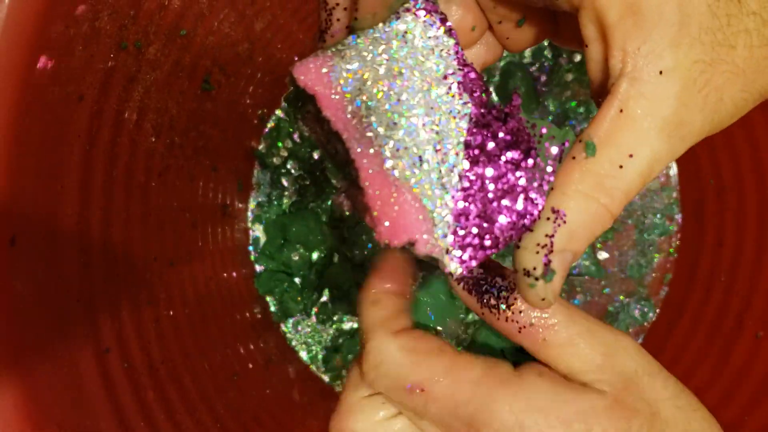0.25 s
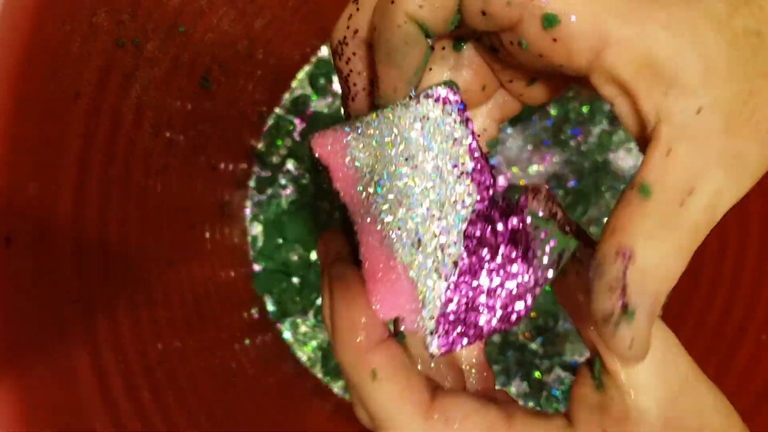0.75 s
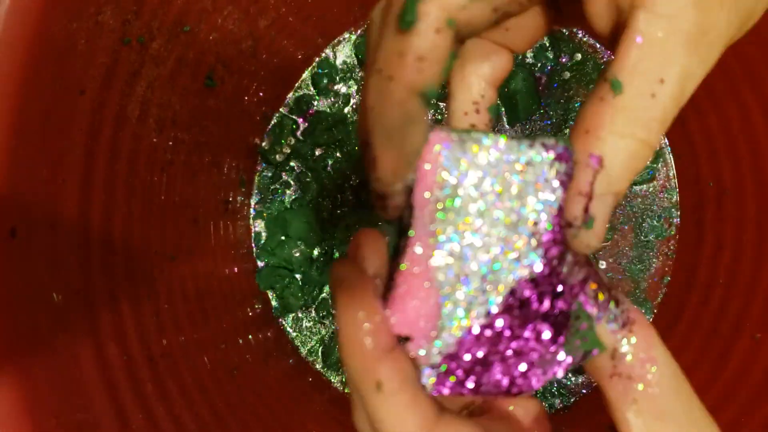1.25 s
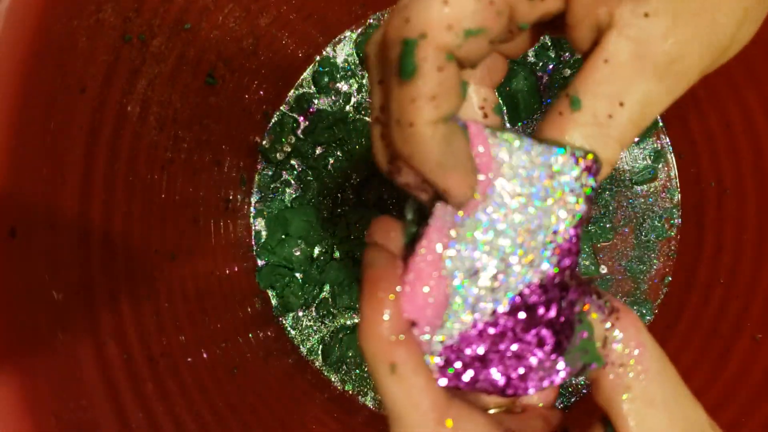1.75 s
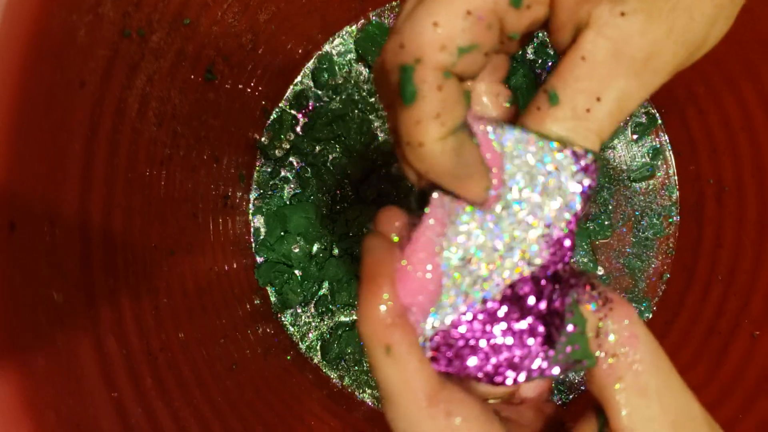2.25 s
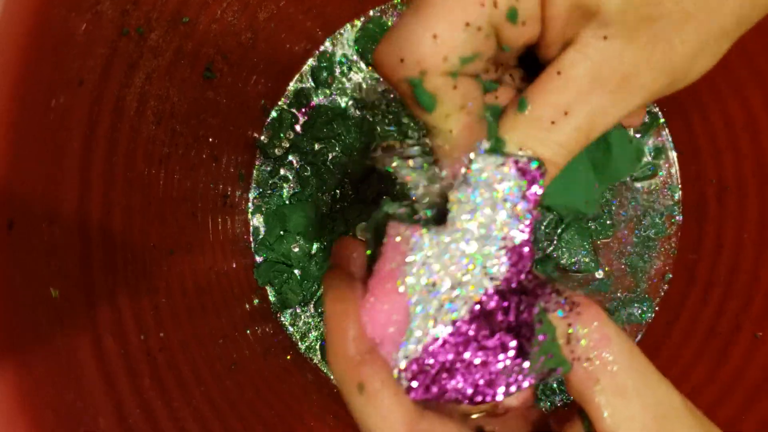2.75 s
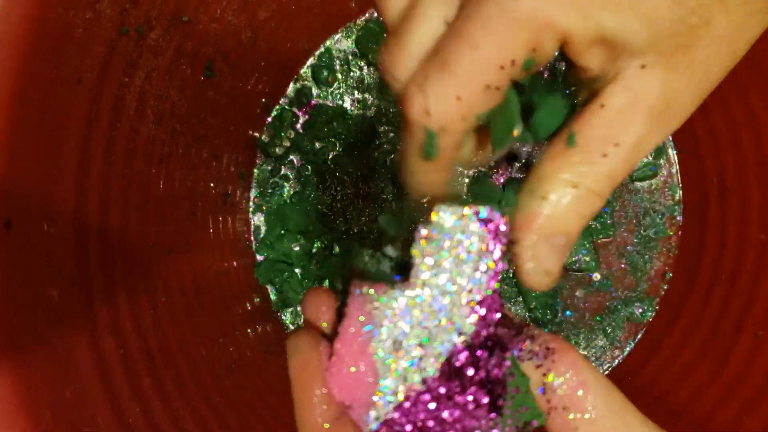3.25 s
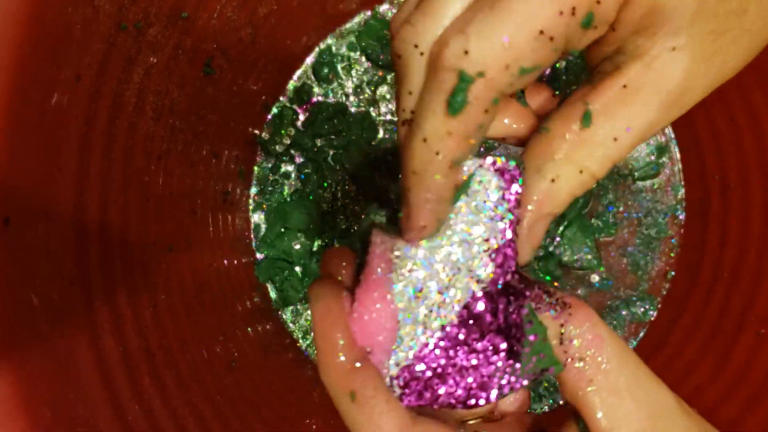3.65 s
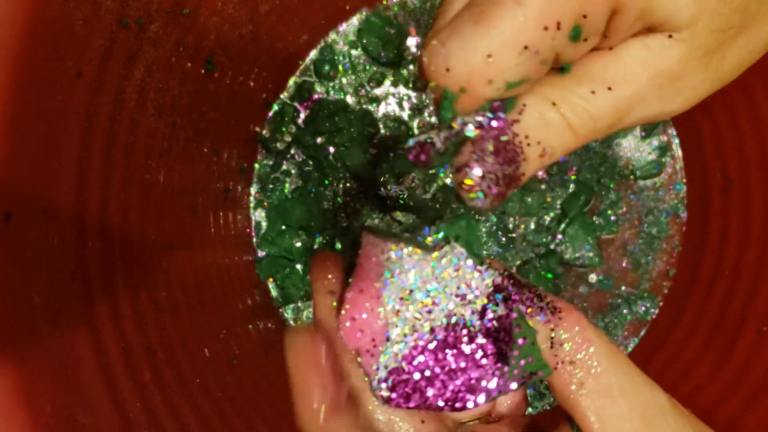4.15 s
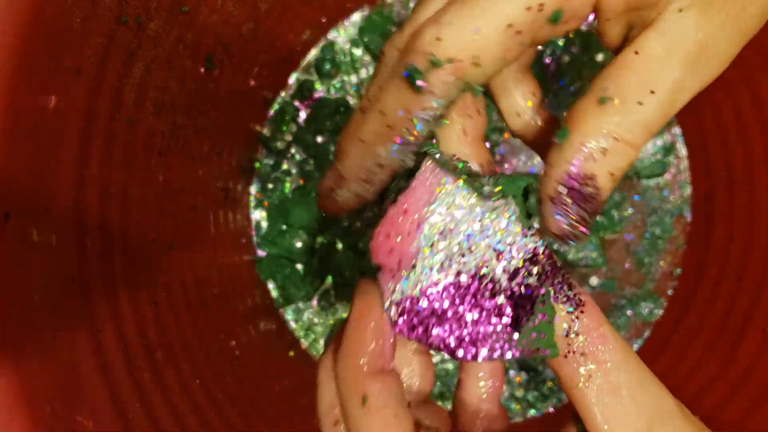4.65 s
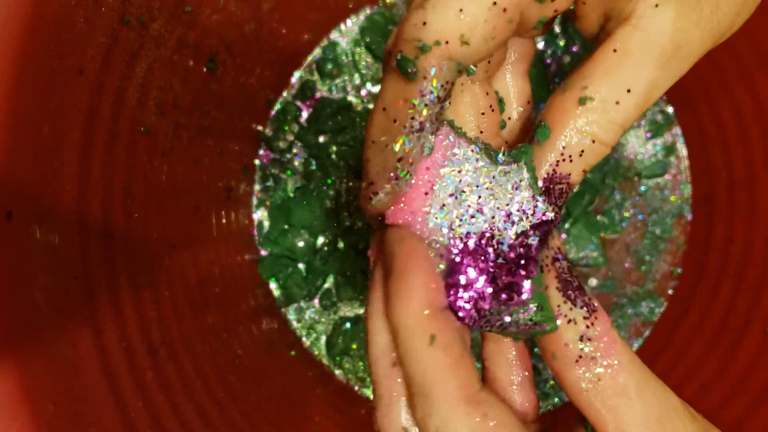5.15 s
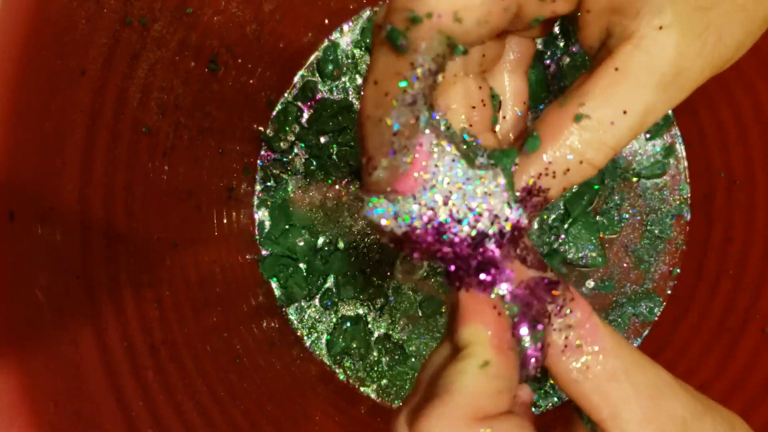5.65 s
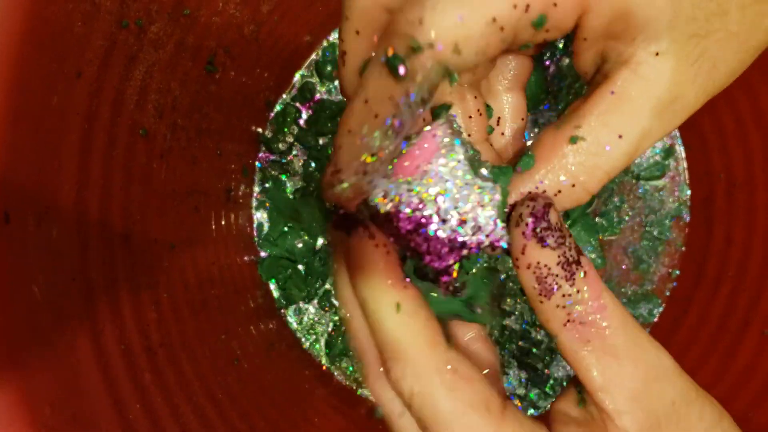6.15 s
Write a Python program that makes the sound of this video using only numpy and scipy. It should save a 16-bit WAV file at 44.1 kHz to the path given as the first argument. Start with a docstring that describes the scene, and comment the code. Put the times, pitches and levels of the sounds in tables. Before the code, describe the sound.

Close, brittle foam crunching comes in uneven squeezes, with small wet slaps and dull basin knocks over quiet room hiss and hum.

```python
"""Wet hands crush a block of floral foam over a plastic basin of water, close to a pair of small microphones.
Cell walls snap in bursts over fine crackle: torn-foam noise, opened by levels and rung at each snap's pitch.
Soft breath-like hiss, wet squelch and slaps are shaped noise; blows ring the basin's modes; wet chirps glide.
Behind them a table mode shudders, filtered noise rumbles and booms, wavering tones hum, and room air hisses."""
import sys
import numpy as np
from scipy import signal
from scipy.fft import rfft, irfft, next_fast_len
from scipy.io import wavfile

SR = 44100
rng = np.random.default_rng(int(sys.argv[2]) if len(sys.argv) > 2 else 0)


def to_wav(s):
    """Save 16-bit WAV."""
    ch = np.atleast_2d(s).T  # columns
    pcm = np.round(np.clip(ch, -1, 1) * 32767)  # PCM
    wavfile.write(sys.argv[1], SR, pcm.astype(np.int16))


N = 282229

# squeeze of the hands: start_s, pressure_db (level of fine crackle), soft_db (level of soft hiss and squelch)
SQUEEZE = [(0.0, -54.5, -92), (0.2, -55.5, -80), (0.45, -76, -90), (0.7, -58.5, -75.5), (0.85, -71.5, -98),
           (1.2, -70, -95), (1.4, -61, -102), (1.66, -60, -57.5), (1.77, -65, -65), (1.88, -85, -64),
           (2.05, -59, -72), (2.21, -45.5, -66), (2.42, -45.5, -63), (2.6, -48, -70), (2.97, -43, -66),
           (3.26, -49.5, -72), (3.42, -58, -86), (3.65, -52, -77), (3.95, -66.5, -90), (4.3, -55.5, -84),
           (4.8, -63.5, -82), (5.1, -71.5, -86), (5.25, -56, -89), (5.42, -62, -59.5), (5.52, -63.5, -78),
           (5.78, -51, -69), (6.06, -43.5, -60.5), (6.27, -48.5, -72), (6.4, -59, -81)]
# spectrum of torn foam: freq_hz, density_db (per Hz)
FOAM_SPECTRUM = [(470, -54), (800, -8), (1120, -12), (1290, -11.5), (1800, -6.5), (1940, -10), (2310, -11),
                 (2820, -9), (3620, -15), (4710, -17), (7290, -13), (8900, -13), (13300, -2), (14500, 0.5),
                 (15800, -13)]
# blows of crumbs and hands on the basin: start_s, thud_db, knock_db (levels ahead of the mode gains)
BLOWS = [(0.06, -30, -49.5), (0.635, -43, -68), (0.66, -38, -44.5), (0.688, -32, -35), (2.13, -44, -62),
         (2.206, -38.5, -51.5), (2.251, -39, -49), (2.76, -44, -50), (2.853, -55, -50.5), (2.906, -57, -41),
         (3.194, -56, -51), (3.441, -27, -43.5), (3.553, -42, -47.5), (3.621, -39.5, -58),
         (3.649, -36, -64), (4.686, -55, -47), (4.752, -44, -42.5), (5.625, -53, -50), (6.049, -37, -49.5),
         (6.31, -51, -59)]
FIRM_DB = -47   # pressure of a firm squeeze
CREST_DB = 8.5   # peak of a noisy splash over its rms


def from_db(db):
    """Amplitude ratio of a level in dB."""
    return 10 ** (np.asarray(db) / 20)


def rms_one(x):
    """Scale to rms 1 over all channels."""
    return x / np.sqrt(np.mean(x ** 2) + 1e-20)


def in_time(rows):
    """Table columns interpolated to every sample."""
    s, *columns = np.transpose(rows)
    return [np.interp(np.arange(N) / SR, s, c) for c in columns]


def at_hz(points, hz):
    """Spectrum level in dB, interpolated over log frequency."""
    points_hz, points_db = np.transpose(points)
    return np.interp(np.log(hz), np.log(points_hz), points_db)


def colour(x, points):
    """Weight a signal by a spectrum."""
    size = next_fast_len(N)
    hz = np.maximum(np.fft.rfftfreq(size, 1 / SR), 1)
    return irfft(rfft(x, size) * from_db(at_hz(points, hz)), size)[..., :N]


def band(x, low_hz, high_hz):
    """Third-order Butterworth band-pass."""
    return signal.sosfilt(signal.butter(3, [low_hz, high_hz], "band", fs=SR, output="sos"), x)


def resonance(x, hz, width_hz):
    """Two-pole resonator with zeros at 0 Hz and near the top of the spectrum."""
    r = np.exp(-np.pi * width_hz / SR)
    return signal.lfilter([1 - r, 0, r - 1], [1, -2 * r * np.cos(2 * np.pi * hz / SR), r * r], x)


def sides(pan_db):
    """Left and right gains that differ by pan_db; positive is louder at left."""
    return from_db([[pan_db / 2], [-pan_db / 2]])


def drift(rate_hz):
    """Low-passed chance variation with rms 1."""
    r = np.exp(-2 * np.pi * rate_hz / SR)
    chance = rng.standard_normal(N + SR)
    return rms_one(signal.lfilter([1], [1, -2 * r, r * r], chance)[SR:])


def pair(alike):
    """White noise at two microphones, correlated by alike; rms 1."""
    alike = np.clip(alike, 0, 1)
    mid, side = rng.standard_normal((2, N))
    return (np.sqrt(1 + alike) * mid + np.sqrt(1 - alike) * side * [[1], [-1]]) / np.sqrt(2)


def burst(t, t60_s, tail_db, swell=.13, linger=7.74):
    """A tear swells, falls slowly and then faster, and rings on faintly in the basin."""
    t60_s = np.clip(t60_s, .006, .4)
    rise = np.sin(np.pi / 2 * np.minimum(t / (swell * t60_s), 1)) ** 2
    fall = from_db(-60 * (t / t60_s) ** 1.393)
    tail = from_db(tail_db - 60 * t / (linger * t60_s))
    return rise * (fall + tail)


def small_snaps(per_s, spread_db, t60_s):
    """Random little tears, each a decaying step of power over a floor, as a level with power mean 1."""
    size = from_db(2 * spread_db * np.minimum(rng.exponential(1, N), 4))
    starts = size * (rng.random(N) < per_s / SR)
    power = .6 + signal.lfilter([1], [1, -from_db(-120 / (t60_s * SR))], starts)
    return rms_one(np.sqrt(power))


def knocks(rows, ragged_db, splash_db):
    """Damped rings of uneven level, whose pitch may glide at the start, each in a slower-fading noise splash."""
    out, t = np.zeros((2, N)), np.arange(SR // 3) / SR
    ragged = from_db(ragged_db * drift(60))
    noise, chance = rng.standard_normal((2, N)), rng.random((len(rows), 2))
    for (s, peak_db, hz, t60_s, rise_oct_per_s), (start, lean) in zip(rows, chance):
        i, t60_s = max(round(s * SR), 0), np.clip(t60_s, .01, .5)
        u = t[:N - i]
        span = slice(i, i + len(u))
        glide_hz = hz * 2 ** (rise_oct_per_s * np.minimum(u, t60_s / 3))
        turns = np.cumsum(glide_hz) / SR
        tone = np.sin(2 * np.pi * (turns + start)) * ragged[span]
        splash = rms_one(band(noise[:, span], 0.82 * hz, 1.584 * hz))
        splash = splash * from_db(splash_db + 30 * u / t60_s)   # undoes half of the fade
        fade = (1 - np.exp(-u * hz)) * from_db(peak_db - 60 * u / t60_s)
        out[:, span] += fade * (tone * sides(6 * lean - 3) + splash)
    return out


def struck(modes, column):
    """Every blow rings every mode, each time with a somewhat different strength."""
    luck_db = rng.normal(0, 0.84, (len(BLOWS), len(modes)))
    return [(blow[0], blow[column] + gain_db + extra_db, hz, t60_s, 0)
            for blow, row in zip(BLOWS, luck_db)
            for (hz, gain_db, t60_s), extra_db in zip(modes, row)]


def room_air():
    """Steady coloured noise, almost independent at the two microphones."""
    # room noise spectrum: freq_hz, density_db (per Hz)
    room_spectrum = [(190, -34), (330, -11.5), (631, -18), (684, -18.5), (1040, -16), (1840, -23),
                     (5090, -36.5), (7260, -21), (9570, -25.5), (15800, -5)]
    return from_db(-57) * rms_one(colour(pair(0.022), room_spectrum))


def hum():
    """Motor tones that waver a little in strength and phase."""
    # appliance tones: freq_hz, waver_hz, level_db (rms)
    tones = [(118, 4.8, -62), (220.4, 28, -69)]
    t, out = np.arange(N) / SR, 0
    for hz, waver_hz, level_db in tones:
        level = np.sqrt(2) * from_db(level_db + 1.5 * drift(waver_hz))
        out = out + level * np.sin(2 * np.pi * hz * t + 0.41 * drift(waver_hz))
    return out * sides(-1.6)


def rumble():
    """Handling and floor vibration: deep rumble and broader boom; thuds jolt and pressure swells both."""
    # boom spectrum: freq_hz, density_db (per Hz)
    boom_spectrum = [(18, -70), (30, -0.5), (70, -23), (100, -12), (124, -0.5), (174, -5), (235, -5),
                     (400, -21.5), (520, -38), (880, -120)]
    rumble_hz, width_hz, jolt_t60_s = 68.2, 60.0, 0.48
    low_db, low_waver_db, low_press_db, low_jolt_db = -74.5, 4.5, -8.5, -23
    boom_db, boom_firm_db, boom_db_per_pressure_db, boom_jolt_db = -66, -56.5, 0.5, -20.5
    kicks = np.zeros(N)
    for s, thud_db, _ in BLOWS:
        kicks[round(s * SR)] = from_db(thud_db)
    jolts = signal.lfilter([1], [1, -from_db(-60 / (jolt_t60_s * SR))], kicks)
    pressure_db = in_time(SQUEEZE)[0]
    pressed = from_db(boom_firm_db + boom_db_per_pressure_db * (pressure_db - FIRM_DB))
    low = resonance(resonance(pair(0.93), rumble_hz, width_hz), rumble_hz, width_hz)
    low_level = from_db(low_db + low_waver_db * drift(10.0))
    low_level = low_level + from_db(low_press_db) * pressed + from_db(low_jolt_db) * jolts
    boom = colour(pair(.93), boom_spectrum)
    boom = boom / np.sqrt(np.mean(band(boom, 90.0, 390) ** 2))
    boom_level = np.hypot(from_db(boom_db), pressed) + from_db(boom_jolt_db) * jolts
    return sides(-2.0) * rms_one(low) * low_level + boom_level * boom


def shudder():
    """One low mode of the table top, kept going for a moment while it sags in level."""
    start_s, hold_s, edge_s = 0.717, 0.207, 0.094
    pitch_hz, level_db, sag_db_per_s = 86.6, -47, 11
    t = np.arange(N) / SR
    held = np.clip(np.minimum(t - start_s, start_s + hold_s - t) / edge_s + 1, 0, 1)
    sag_db = sag_db_per_s * np.clip(t - start_s, 0, 1)
    level = np.sqrt(2) * from_db(level_db - sag_db + 1.2 * drift(10.0))
    return level * held * np.sin(2 * np.pi * pitch_hz * t) * sides(-1.6)


def thuds():
    """Blows ring the low modes of the basin bottom."""
    # bottom modes: freq_hz, gain_db, t60_s
    bottom_modes = [(131.8, -9, .2), (169.8, 1.5, 0.1)]
    return knocks(struck(bottom_modes, column=1), ragged_db=2.5, splash_db=-16.0)


def taps():
    """Blows ring the higher, shorter modes of the basin wall."""
    # wall modes: freq_hz, gain_db, t60_s
    wall_modes = [(441, -13, 0.12), (518.4, -5.5, 0.086), (642, -10.5, 0.055)]
    return knocks(struck(wall_modes, column=2), ragged_db=2.5, splash_db=-6.5)


def chirps():
    """Wet chirps: ragged damped tones that glide in pitch over the first third of t60."""
    # chirps: start_s, peak_db, pitch_hz (at start), t60_s, rise_oct_per_s
    chirp_rows = [(3.78, -56, 3300, 0.2, -1.2), (4.607, -39.5, 1720, 0.065, 8),
                  (4.617, -43, 2050, 0.075, 26)]
    return knocks(chirp_rows, ragged_db=6.0, splash_db=-9)


def slaps():
    """A ragged splash of noise around the pitch of the pocket that closes, lingering in the basin."""
    # wet slaps of crumbs and fingers: start_s, peak_db (nominal, ahead of pan), pitch_hz, t60_s
    slap_rows = [(0.6873, -44, 1810, 0.035), (2.0528, -41, 3000, 0.038), (2.2317, -47, 1520, 0.035),
                 (2.26, -37.5, 1280, 0.024), (2.2972, -44, 2630, 0.034), (2.3912, -36, 3620, 0.043),
                 (2.541, -42.5, 3660, 0.041), (2.572, -51, 1450, 0.053), (2.7456, -50.5, 2010, 0.11),
                 (2.8624, -46.5, 3050, 0.054), (2.88, -45, 2090, 0.045), (2.9024, -35, 1950, 0.042),
                 (2.9967, -42, 3480, 0.041), (3.1882, -43, 2160, 0.033), (3.4426, -30.5, 2050, 0.029),
                 (3.5094, -40, 1630, 0.029), (3.547, -48, 1600, 0.029), (3.5935, -41.5, 2920, 0.015),
                 (3.6301, -54, 1360, 0.038), (3.651, -60, 1670, 0.03), (3.7793, -48, 3250, 0.06),
                 (4.6283, -46, 1740, 0.051), (4.686, -50, 1150, 0.052), (4.7528, -52.5, 1200, 0.016),
                 (5.6209, -45.5, 1600, 0.03), (5.689, -44, 2880, 0.065), (5.9913, -48, 2420, 0.045),
                 (6.0242, -37.5, 2760, 0.036), (6.1763, -42, 2900, 0.019)]
    out, t = np.zeros((2, N)), np.arange(SR // 4) / SR
    spray = pair(0.12) * from_db(1.52 * drift(113))
    for s, peak_db, hz, t60_s in slap_rows:
        span = slice(round(s * SR), round(s * SR) + len(t))
        wide = band(spray[:, span], 1050, 3500)
        splash = rms_one(rms_one(resonance(wide, hz, .2 * hz)) + .55 * rms_one(wide))
        shape = burst(t[:N - span.start], t60_s, tail_db=-7.0, swell=0.024, linger=9.5)
        out[:, span] += from_db(peak_db - CREST_DB) * shape * splash
    return out * sides(-3.5)


def hiss_and_squelch(tear):
    """Soft breath-like hiss and wet squelch: noise through resonances, plus a dull body that follows pressure."""
    # resonances of the soft hiss and squelch: freq_hz, width_hz (the filter is 4.3 times as wide), gain_db
    hiss_modes = [(1298, 19, 9.5), (1630, 74, 3), (1970, 34, 4), (2790, 69, -3), (3400, 17, -3)]
    grain, high_hiss_db = 0.44, -0.5   # torn-foam share in the noise; high hiss against the soft level
    dull_firm_db, dull_db_per_pressure_db = -72.5, 0.59
    pressure_db, soft_db = in_time(SQUEEZE)
    smooth = rms_one(colour(pair(0.052), FOAM_SPECTRUM))
    source = band(smooth + grain * rms_one(tear), 800, 4300)
    soft = 0.28 * source
    for hz, width_hz, gain_db in hiss_modes:
        soft = soft + from_db(gain_db) * resonance(source, hz, 4.3 * width_hz)
    high_hiss = from_db(soft_db + high_hiss_db) * sides(-6.0) * rms_one(band(smooth, 4000, 7670))
    flicker = from_db(2.0 * drift(25)) * small_snaps(per_s=120.0, spread_db=1.0, t60_s=.025)
    dull_db = dull_firm_db + dull_db_per_pressure_db * (pressure_db - FIRM_DB)
    dull = from_db(dull_db) * rms_one(band(pair(.3), 386, 804))
    return high_hiss + flicker * (from_db(soft_db) * sides(-2.5) * rms_one(soft) + dull)


def torn_foam(cells_db, per_s, cycles):
    """Tearing foam: steady noise, and single cells of all sizes that pop and ring."""
    tearing = pair(0)
    pops = (rng.random(N) < per_s / SR) * from_db(3.5 * np.minimum(rng.exponential(1, N), 2.5))
    pops = pops * rng.standard_normal((2, N)) + 1e-18   # each microphone hears a cell in its own way
    dealt = rng.integers(0, 14, N)   # which pitch each pop rings
    cells = sum(resonance(pops * (dealt == k), hz, hz / cycles) * hz ** -.25
                for k, hz in enumerate(np.geomspace(1200, 15500, num=14)))
    return colour(rms_one(tearing) + from_db(cells_db) * rms_one(cells), FOAM_SPECTRUM)


def crunch(tear):
    """Snaps and the crackle bed open the same torn-foam noise; each snap rings at a pitch of its own."""
    # loud snaps: start_s, bright_peak_db (nominal, ahead of tilt), ring_db (rms ahead of the burst shape),
    # pitch_hz, bright_pan_db, t60_s
    snap_rows = [(0.0484, -51, -68, 6000, 9, 0.036), (0.0586, -31, -45.5, 6540, 2.5, 0.043),
                 (0.1574, -41, -65, 6740, -2, 0.021), (0.3445, -41, -61.5, 7400, 7.5, 0.042),
                 (0.414, -28, -61, 7330, 6.5, 0.017), (0.5747, -44, -58.5, 7350, 5, 0.019),
                 (0.6347, -42.5, -60.5, 7160, -1, 0.024), (0.6863, -23, -57, 4190, 3, 0.027),
                 (1.365, -46, -86, 7500, -1, 0.025), (1.6, -36, -64, 7160, 4, 0.03),
                 (2.007, -39, -71, 7600, 0, 0.017), (2.0417, -24.5, -48, 9000, 3, 0.022),
                 (2.0497, -23, -46, 5470, 5, 0.021), (2.0868, -26, -40.5, 7050, -2, 0.015),
                 (2.1448, -28, -43, 5570, -1, 0.016), (2.18, -26, -44.5, 5810, 1.5, 0.017),
                 (2.2024, -27, -52, 7260, 1.0, 0.022), (2.2164, -31, -65, 9000, -0.5, 0.019),
                 (2.2335, -23, -45, 7210, -1, 0.025), (2.2424, -24, -45, 6700, 0.5, 0.022),
                 (2.2744, -26, -53, 6690, 0.5, 0.015), (2.296, -20, -33, 7900, 1.0, 0.011),
                 (2.325, -18, -40.5, 7560, 1, 0.013), (2.3724, -28, -38.5, 6160, -2, 0.024),
                 (2.396, -21, -31.5, 6740, -2, 0.019), (2.448, -33, -44, 5000, 1, 0.02),
                 (2.4663, -20, -42.5, 6720, 2.0, 0.019), (2.4922, -25, -44, 7500, 2.5, 0.014),
                 (2.5426, -11.5, -38, 6300, -8, 0.019), (2.574, -20, -46, 6680, 2, 0.018),
                 (2.623, -35, -49, 6200, -0.5, 0.024), (2.6434, -17, -45, 7650, -2, 0.013),
                 (2.7087, -26, -52, 6590, -3, 0.024), (2.7455, -21.5, -49, 6790, 3.0, 0.022),
                 (2.7706, -23, -39, 6110, 6, 0.017), (2.796, -38, -42.5, 4120, 3.0, 0.012),
                 (2.8501, -13.5, -30.5, 7460, 4.5, 0.026), (2.88, -23.5, -43, 6400, 3.5, 0.044),
                 (2.9304, -33, -52, 7100, -4, 0.018), (2.9578, -20.5, -37, 4240, 1, 0.031),
                 (2.9972, -11.5, -37.5, 7050, 3, 0.019), (3.03, -27, -50, 6160, 3, 0.022),
                 (3.0837, -39, -53, 5630, 4, 0.018), (3.124, -33, -50, 7300, 2, 0.017),
                 (3.1886, -26.5, -39.5, 7950, -1.5, 0.026), (3.2835, -45, -55, 6980, 4.5, 0.026),
                 (3.3458, -33, -44.5, 8360, 3.0, 0.017), (3.3908, -21.5, -64, 8270, 5, 0.016),
                 (3.4413, -15.5, -42.5, 6380, 1, 0.023), (3.507, -24.5, -46, 5920, 4, 0.021),
                 (3.548, -18.5, -38.5, 7200, 6, 0.013), (3.5944, -22, -37, 6860, 1.0, 0.014),
                 (3.631, -29.5, -72, 6980, 2, 0.023), (3.646, -37, -48, 6850, -8, 0.016),
                 (3.7015, -26.5, -48, 7200, -4, 0.052), (3.7813, -39, -51.5, 6300, 3.5, 0.059),
                 (3.9487, -25, -56, 7800, 0, 0.02), (4.08, -40, -61, 7400, -6, 0.036),
                 (4.11, -38.5, -59, 7500, 0, 0.051), (4.1377, -35, -50.5, 7300, 4, 0.034),
                 (4.2437, -23.5, -46.5, 7300, -1, 0.028), (4.3335, -26, -48, 7140, 5, 0.033),
                 (4.3757, -38, -59, 4360, 3, 0.016), (4.5088, -24.5, -53.5, 7300, -5, 0.012),
                 (4.5805, -25.5, -51.5, 7550, 1, 0.019), (4.6183, -36, -69, 6600, 4, 0.02),
                 (4.7007, -44, -68, 7850, -8, 0.013), (4.7522, -27, -54.5, 6450, 5, 0.026),
                 (4.801, -40, -56, 6900, 1.0, 0.042), (4.8766, -48, -64, 7710, -3, 0.024),
                 (4.9284, -50, -59, 7160, 3.0, 0.03), (4.9853, -41, -69, 6290, 1, 0.013),
                 (5.227, -31, -52.5, 6700, -5, 0.019), (5.5016, -45, -67, 6990, 2, 0.022),
                 (5.554, -34.5, -61, 8110, -2, 0.022), (5.5865, -29.5, -53.5, 8710, -0.5, 0.031),
                 (5.6195, -25, -38.5, 4700, 2.0, 0.028), (5.676, -25.5, -39, 7210, -6, 0.025),
                 (5.6891, -28, -47, 7510, -5, 0.024), (5.7, -9, -36.5, 4900, -6, 0.015),
                 (5.7184, -25, -60, 7220, 1.5, 0.03), (5.7376, -27, -43.5, 7540, -0.5, 0.033),
                 (5.7852, -27, -52, 8470, -1, 0.021), (5.7943, -21, -55, 7690, 5, 0.028),
                 (5.834, -27.5, -35, 4700, 2.0, 0.022), (5.8702, -27, -43, 7100, 0, 0.017),
                 (5.8837, -28.5, -49, 4200, 3.5, 0.048), (5.915, -33, -64, 7400, 1, 0.024),
                 (5.9536, -27, -47, 4220, -1, 0.028), (5.991, -25, -64, 7300, 3.0, 0.017),
                 (6.0224, -25, -36, 6300, -3, 0.019), (6.0563, -22.5, -51, 7820, -1, 0.017),
                 (6.077, -19, -66, 8800, 2.0, 0.017), (6.114, -7, -45, 7060, 3.5, 0.015),
                 (6.1414, -27, -43, 7050, 3.5, 0.019), (6.1468, -24, -30.5, 4710, 5.0, 0.025),
                 (6.1744, -21.5, -41, 6060, 5, 0.02), (6.2576, -33, -55, 7210, 5, 0.023),
                 (6.307, -41, -86, 7530, 12, 0.013), (6.3704, -45, -66, 6240, 9, 0.024)]
    mid_crackle_db = -12   # against pressure
    ring_pan_mean_db, ring_pan_spread_db = -4.5, 4
    tilt_per_db, usual_snap_db = 0.27, -19   # louder snaps lean further to the upper treble
    pressure_db = in_time(SQUEEZE)[0]

    lower, upper = band(tear, 9000, 13600), band(tear, 13600, 20500)
    treble = np.array([lower * sides(-3.0), upper * sides(3.0)]) / np.std(lower + upper)
    crumbs = rms_one(band(tear, 2200, 4500))   # thicker crumbs break along and sound lower
    body = rms_one(band(tear, 4160, 7600))

    fine = small_snaps(per_s=190.0, spread_db=3.0, t60_s=0.051)
    crackle_power = (fine * from_db(pressure_db) * sides(2.4)) ** 2
    bright_power = np.array([crackle_power, crackle_power])   # treble band, side, time
    mid_level = fine * from_db(pressure_db + mid_crackle_db)
    out = mid_level * sides(-3.5) * (body + 0.26 * crumbs)

    t, chance = np.arange(SR // 5) / SR, rng.standard_normal((len(snap_rows), 2))
    for (s, peak_db, ring_db, hz, bright_pan_db, t60_s), (thin, lean) in zip(snap_rows, chance):
        span = slice(round(s * SR), round(s * SR) + len(t))
        u, raw = t[:N - span.start], body[:, span]
        tilt_db = 2.4 * thin + tilt_per_db * (peak_db - usual_snap_db)   # thin walls snap higher
        tilt = from_db([[[-tilt_db]], [[0.17 * tilt_db]]])
        snap = from_db(peak_db - CREST_DB) * sides(bright_pan_db) * burst(u, t60_s, tail_db=-12.5)
        bright_power[..., span] += (tilt * snap) ** 2

        ring = rms_one(resonance(raw, hz, 0.18 * hz))
        ring = rms_one(ring + 0.61 * raw) + 0.081 * crumbs[:, span]
        ring_pan = sides(ring_pan_mean_db + ring_pan_spread_db * lean)
        out[:, span] += from_db(ring_db) * ring_pan * burst(u, 0.97 * t60_s, tail_db=-6.5) * ring
    return out + (np.sqrt(bright_power) * treble).sum(axis=0)


def scene():
    """Room and table, blows and slaps at the basin, soft hiss and squelch, and the foam being crushed."""
    background = room_air() + hum() + rumble() + shudder()
    basin = thuds() + taps() + chirps() + slaps()
    tear = torn_foam(cells_db=-2.5, per_s=1200.0, cycles=4.7)
    return background + basin + hiss_and_squelch(tear) + crunch(tear)


def record(dry):
    """Small capsules lose the deepest bass; the top is cut."""
    dry = signal.sosfilt(signal.butter(4, 44.0, "high", fs=SR, output="sos"), dry)
    cutoff_hz = 15950
    return signal.sosfilt(signal.ellip(12, .5, 70, cutoff_hz, fs=SR, output="sos"), dry)


dry = scene()
out = record(dry)
to_wav(out)
```